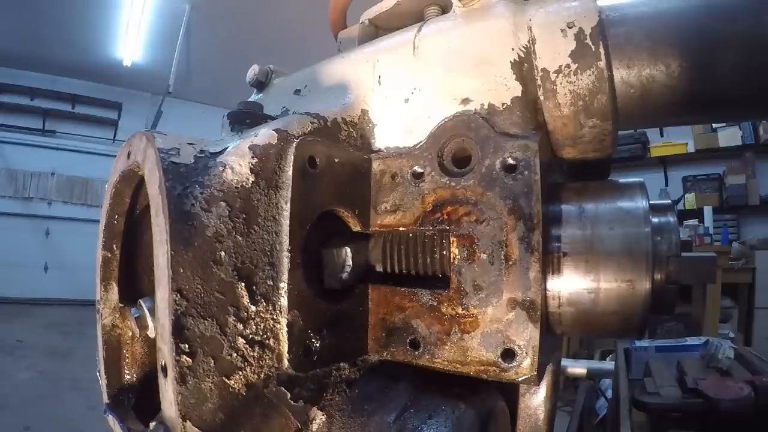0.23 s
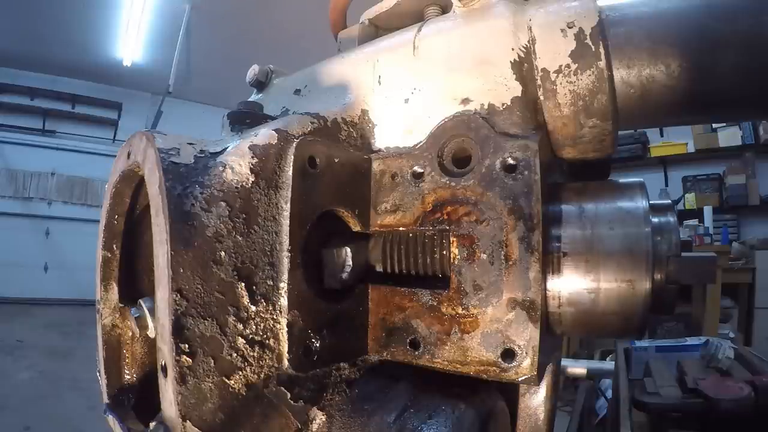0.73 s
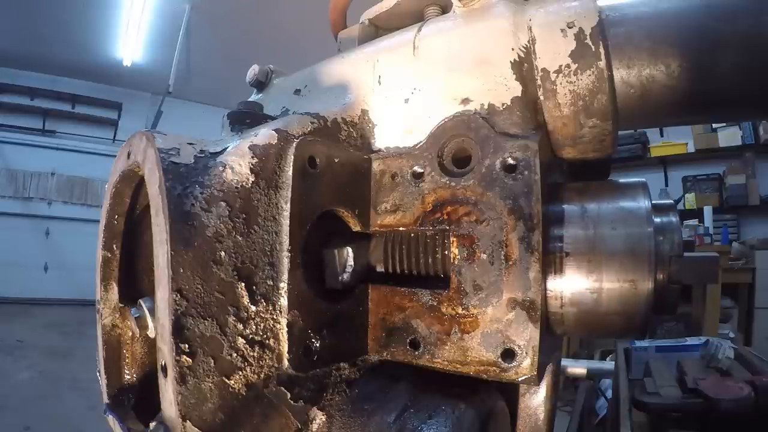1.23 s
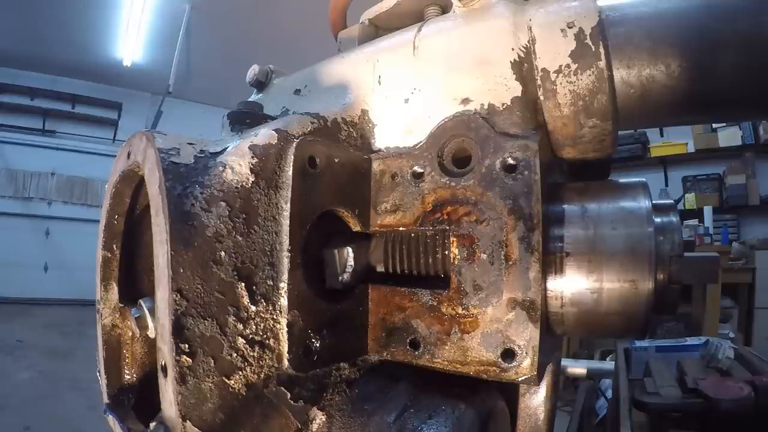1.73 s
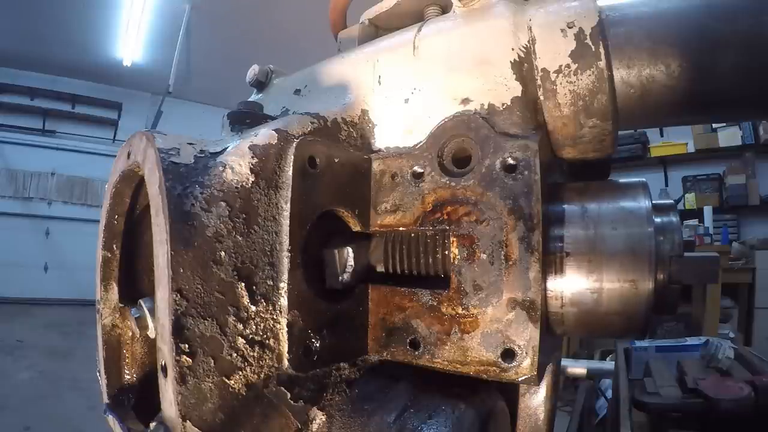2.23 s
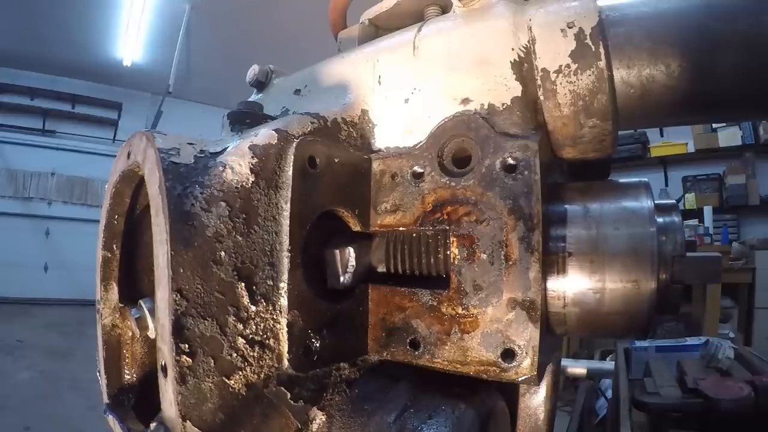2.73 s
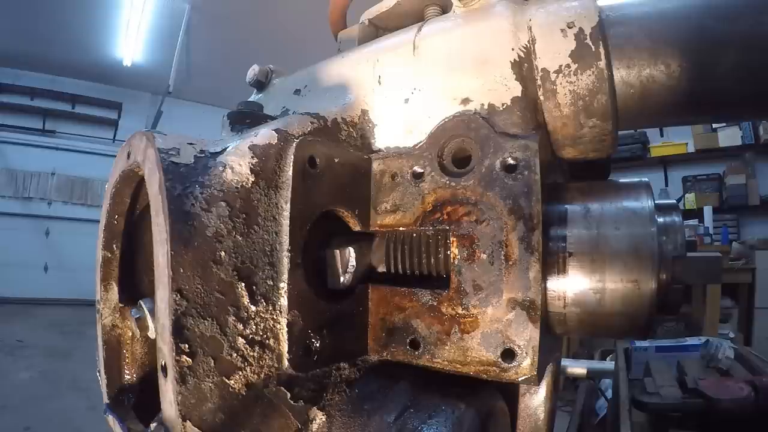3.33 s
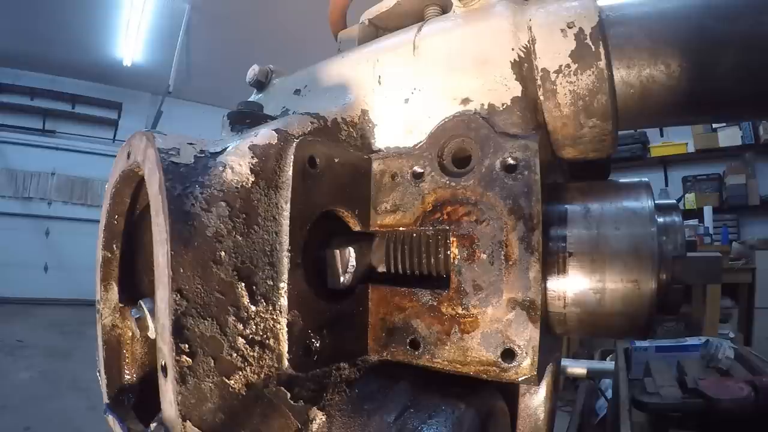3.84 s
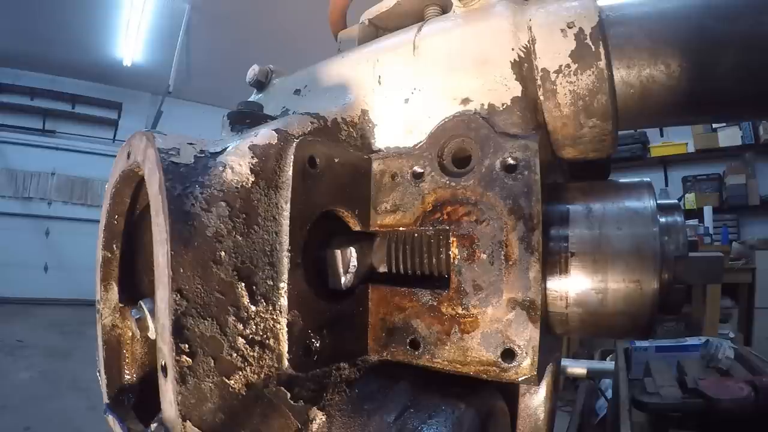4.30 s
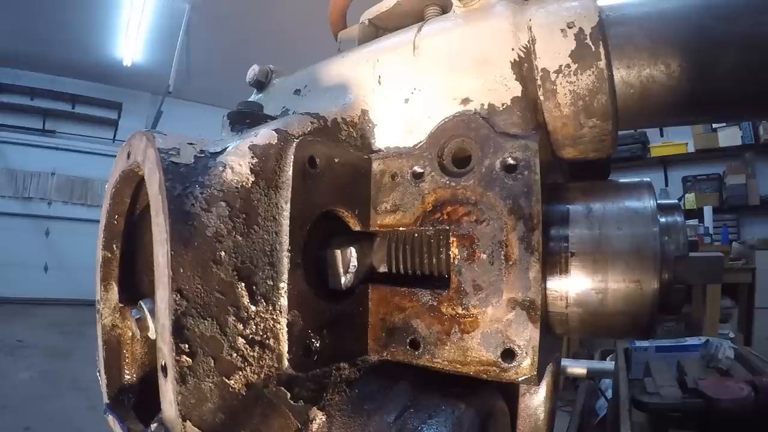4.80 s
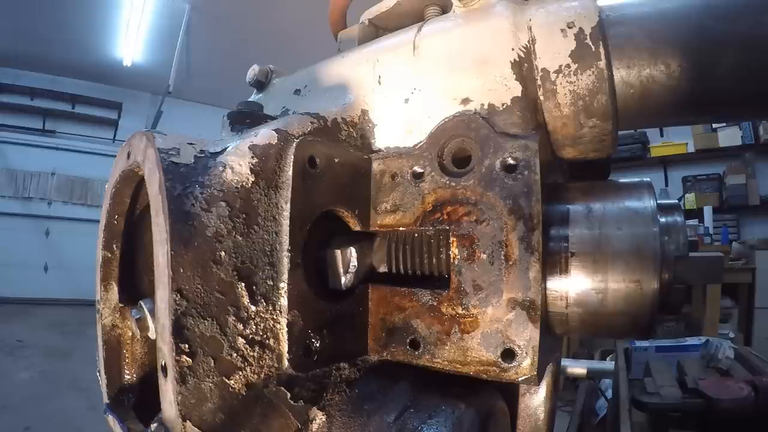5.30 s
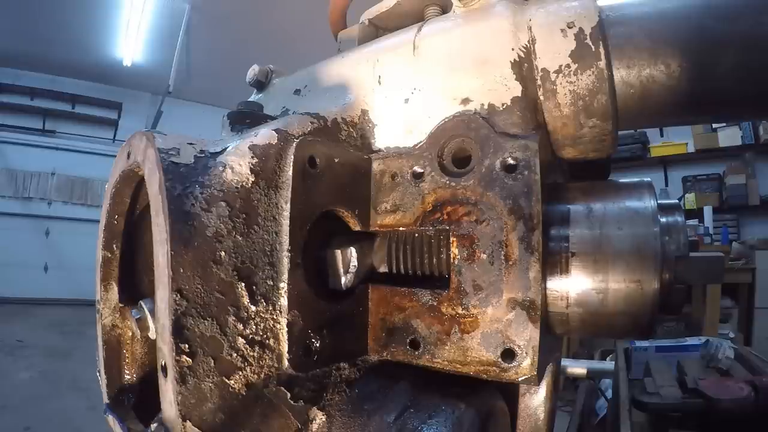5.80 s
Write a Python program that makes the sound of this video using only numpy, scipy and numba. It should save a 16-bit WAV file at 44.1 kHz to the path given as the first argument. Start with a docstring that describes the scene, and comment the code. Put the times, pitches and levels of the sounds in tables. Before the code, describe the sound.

Four loud, ringing metal bangs as a hydraulic ram forces a stuck shaft, with hand pump knocks and clinks between them over workshop hum.

```python
"""In a workshop, close to a small camera, a hydraulic ram forces a stuck shaft out of a cast housing.
Each stroke of the hand pump knocks, clinks and ticks as its metal parts meet. Then the shaft slips
with a bang that sets the steel and the room ringing. Shop machinery hums underneath,
and the camera's limiter turns everything down for a moment after each bang."""
import sys
import numpy as np
from scipy import signal
from scipy.fft import rfft, irfft
from scipy.io import wavfile
from numba import njit

SR = 44100
rng = np.random.default_rng(int(sys.argv[2]) if len(sys.argv) > 2 else 0)


def dump(signal):
    """Clip the signal to [-1, 1] and save it as 16-bit WAV at the path in sys.argv[1]."""
    limited = np.clip(np.atleast_2d(signal).T, -1, 1)
    pcm = np.round(limited * 32767).astype(np.int16)
    wavfile.write(sys.argv[1], SR, pcm)


N = 266977


def amp(db):
    """Turn decibels into a gain."""
    return 10 ** (np.asarray(db) / 20)


def along(points, f):
    """Read a (frequency, value) table between its rows, on a scale of octaves."""
    hz, value = np.transpose(points)
    return np.interp(np.log(f + 1), np.log(hz), value)


def unit(x):
    """Scale a sound so that its energy is 1."""
    return x / np.sqrt(np.sum(x ** 2))


def add(track, s, sound):
    """Mix a sound into a track, starting at s seconds."""
    start = int(s * SR)
    track[start:start + len(sound)] += sound[:max(N - start, 0)]


def click(colour, size=2048):
    """One click with the given colour, its balance of low and high frequencies."""
    f = np.arange(size // 2 + 1) * SR / size
    cepstrum = irfft(np.log(amp(along(colour, f))))
    cepstrum[1:size // 2] *= 2  # this line and the next pack the energy at the start
    cepstrum[size // 2 + 1:] = 0
    return unit(irfft(np.exp(rfft(cepstrum))))


def ring(notes):
    """One second of struck metal: each note drops 60 dB in its fade time."""
    t = np.arange(SR) / SR
    return sum(amp(db - 60 * t / fade_s) * np.sin(2 * np.pi * hz * t) for hz, db, fade_s in notes)


def scrape(length_s, size=4096, passes=4):
    """A dense burst of tiny impacts that holds steady over its length, then fades 20 dB over each further
    length."""
    fade = amp(-20 * np.arange(size) / SR / length_s)
    burst = rng.standard_normal(size) * fade
    for _ in range(passes):  # even out the frequencies
        spectrum = rfft(burst)
        burst = irfft(spectrum / np.abs(spectrum)) * np.minimum(10 * fade, 1)
    return unit(burst)


def soften(x, cutoff_hz):
    """A gentler contact pushes for longer and leaves the high notes quiet."""
    return signal.sosfilt(signal.butter(2, min(cutoff_hz, SR / 3), fs=SR, output="sos"), x)


def noise(gain_of_hz, width):
    """Stereo noise of strength 1: both ears share the mid part and get the side part with opposite signs."""
    f = np.arange(N // 2 + 1) * SR / N
    mid, side = rfft(rng.standard_normal((2, N))) * gain_of_hz(f)
    side = side * amp(along(width, f))
    stereo = irfft(np.array([mid + side, mid - side]), N)
    return stereo / stereo.std()


# colours of the low rumble and of the air noise: (frequency [Hz], relative level [dB])
RUMBLE_COLOUR = [(3, -27), (20, 10), (60, 8), (110, 0.5), (170, -14), (260, -15), (600, -60)]
AIR_COLOUR = [(100, -31), (170, -1), (395, -2), (468, 0), (586, -13), (668, -10.5), (720, -14.5),
              (806, -14), (1130, -8.5), (1770, -19), (2530, -24.5), (3540, -27.5), (3890, -25.5),
              (4350, -28), (15000, -34)]
# how wide the background noise sounds: (frequency [Hz], side minus mid [dB])
NOISE_WIDTH = [(60, -20), (110, -20), (200, -17), (380, -18.5), (700, -12), (1290, -10.5), (2380, -5),
               (4400, -5.5), (8120, -3), (15000, -4)]
# hum of motors and mains power: (frequency [Hz], level [dB])
HUM_TONES = [(25.3, -53), (50.7, -38), (76.8, -51.5), (101.5, -56.5), (120, -39), (146, -53.5), (154, -55),
             (172, -64), (468, -54.5), (1157, -61)]
# a thin, steady whine: (frequency [Hz], spread [Hz], level [dB])
WHINE_BANDS = [(4785, 48, -66.5), (9560, 170, -66), (14150, 380, -66.5)]


def machinery(waver_db=1.44, rumble_db=-45, air_db=-44):
    """Motors hum at a wavering level, over rumble, air noise and a thin whine."""
    t = np.arange(N) / SR
    out = amp(rumble_db) * noise(lambda f: amp(along(RUMBLE_COLOUR, f)), NOISE_WIDTH)
    out += amp(air_db) * noise(lambda f: amp(along(AIR_COLOUR, f)), NOISE_WIDTH)
    for hz, db in HUM_TONES:
        waver = np.interp(t, np.linspace(0, t[-1], 30), rng.standard_normal(size=30))
        out += np.sqrt(2) * amp(db + waver_db * waver) * np.sin(2 * np.pi * (hz * t + rng.random()))
    for hz, spread_hz, db in WHINE_BANDS:
        out += amp(db) * noise(lambda f: 1 / (1 + ((f - hz) / spread_hz) ** 2), NOISE_WIDTH)
    return out


# how long the room rings: (frequency [Hz], fade time [s])
ROOM_FADE = [(100, .5), (400, 0.68), (1200, 0.8952), (3000, 0.86), (6000, 0.7741), (10000, 0.5),
             (15000, 0.59)]
# colour of that ring: (frequency [Hz], relative level [dB])
ROOM_COLOUR = [(100, -3.5), (250, -3.5), (550, -4), (900, 1), (1250, -6), (1750, -5.5), (2100, -6),
               (2500, -3), (6000, -3.5), (14000, -1.5)]
# how wide it sounds: (frequency [Hz], side minus mid [dB])
ROOM_WIDTH = [(60, -23), (110, -12), (200, -33), (380, -39), (700, -41), (1290, -22.5), (2380, -19.5),
              (4400, -10.5), (8120, -5), (15000, 3.5)]


def room_tail(build_s=0.0028, bands=18):
    """Many reflections blur into a tail that builds quickly and lasts longest at middle pitches."""
    t, f = np.arange(SR) / SR, np.arange(SR // 2 + 1)
    spectrum = rfft(noise(np.ones_like, ROOM_WIDTH)[:, :SR]) * amp(along(ROOM_COLOUR, f))
    centres = np.geomspace(60, 16000, bands)
    tail = 0
    for hz, weights in zip(centres, np.eye(bands)):
        band = irfft(spectrum * along(np.c_[centres, weights], f))
        tail = tail + band * amp(-60 * t / along(ROOM_FADE, hz))
    return unit(tail * (1 - np.exp(-(t / build_s) ** 2)))


# echoes off hard surfaces nearby: (delay [s], relative level [dB])
NEAR_ECHOES = [(.0029, -8.5), (.0044, -8.5), (0.0138, -11), (0.0205, -21.5)]


def in_room(x, tail, tail_db, echo_db):
    """A sound arrives directly, then off nearby surfaces and from all round the room."""
    near = x.copy()
    for delay_s, db in NEAR_ECHOES:
        add(near, delay_s, amp(db + echo_db) * x)
    return near + amp(tail_db) * signal.fftconvolve(x[None], tail, axes=1)[:, :N]


# notes of the steel pump handle: (frequency [Hz], level [dB], fade time [s])
HANDLE_NOTES = [(459, -51, 0.86), (1260, -48, 0.18), (1460, -41.5, 0.55), (1620, -52, .2),
                (2190, -41.5, 0.15), (2610, -51, 0.76), (2710, -46, 0.49), (3060, -31.5, 0.06),
                (3930, -45.5, 0.33), (5450, -54, 0.47)]


def knock(s, db, colour, cutoff_hz, length_s, ring_db, db_per_octave=10):
    """Metal meets metal, brighter when harder, and the handle rings on. Returns impact and ring."""
    impact, ringing = np.zeros(N), np.zeros(N)
    hit = amp(db) * soften(click(colour), cutoff_hz * 2 ** (db / db_per_octave))
    add(impact, s, signal.fftconvolve(scrape(length_s), hit))
    add(ringing, s, amp(ring_db) * signal.fftconvolve(hit, ring(HANDLE_NOTES)))
    return np.array([impact, ringing])


# thuds of the handle: (time [s], level [dB])
THUD_HITS = [(1.109, -10.5), (2.6088, -1), (4.2315, 7), (4.274, -11), (5.7303, -2.5), (5.9878, -0.5)]
# their colour: (frequency [Hz], relative level [dB])
THUD_COLOUR = [(30, -46), (80, -15), (150, -4), (360, -2), (800, -14), (1400, -11.5), (1800, -22),
               (2400, -33), (6000, -24), (12000, -63)]


def handle_thuds():
    """The pump handle meets its stop with a dull thud."""
    return sum(knock(s, db, THUD_COLOUR, cutoff_hz=1790, length_s=0.00526, ring_db=-13)
               for s, db in THUD_HITS)


# clunks of the linkage, the rods that work the pump: (time [s], level [dB], hollow note level [dB])
CLUNK_HITS = [(1.3105, -6.5, 5), (2.827, 3.5, 6), (4.371, -1.5, -5)]
# their colour: (frequency [Hz], relative level [dB])
CLUNK_COLOUR = [(150, -61), (250, -22.5), (506, 2.5), (570, -6), (693, -27), (868, -20.5), (1420, -7.5),
                (1890, -15), (2440, -15.5), (2920, -17), (3450, -25.5), (3890, -23), (4520, -32),
                (5170, -31), (9000, -59), (11700, -86), (19800, -120)]
# tones in the hollow note: (frequency [Hz], level [dB], fade time [s])
LINKAGE_NOTES = [(483, -26.5, 0.074), (523, -33, 0.092), (1274, -27, 0.029)]


def linkage_clunks():
    """The linkage takes up its slack with a clunk and a short, hollow note."""
    impact, ringing = sum(knock(s, db, CLUNK_COLOUR, cutoff_hz=6000, length_s=0.0155, ring_db=-8.5)
                          for s, db, _ in CLUNK_HITS)
    for s, _, note_db in CLUNK_HITS:
        add(ringing, s, amp(note_db) * ring(LINKAGE_NOTES))
    return np.array([impact, ringing])


# clinks of the pin: (time [s], level [dB], relative handle ring [dB])
CLINK_HITS = [(1.579, -16.5, 0), (1.6250, -1, 2), (3.174, -4, -18), (3.196, -7, -22), (4.6806, -7, -12),
              (4.7072, -2.5, -2), (6.041, -16, -12)]
# their colour: (frequency [Hz], relative level [dB])
CLINK_COLOUR = [(350, -56), (600, -17.5), (1020, -8.5), (1390, 0.5), (2080, -10), (2650, -6), (3340, -20),
                (3910, -17.5), (4470, -26.5), (5240, -23), (6680, -34), (8020, -29.5), (11000, -39),
                (14300, -67), (22000, -120)]


def pin_clinks():
    """The pin that the handle turns on clinks brightly."""
    return sum(knock(s, db, CLINK_COLOUR, cutoff_hz=11000, length_s=0.0136, ring_db=ring_db)
               for s, db, ring_db in CLINK_HITS)


# ticks of the joint: (time [s], level [dB])
TICK_HITS = [(0.048, -4.5), (1.941, -4.5), (3.5373, -7), (5.014, -15), (5.4204, -11)]
# their colour: (frequency [Hz], relative level [dB])
TICK_COLOUR = [(260, -33), (450, -0.5), (855, -10.5), (1370, 2.5), (2360, -18), (3090, -11), (3530, -29),
               (3880, -11), (4490, -22.5), (8200, -22.5), (11000, -41), (14300, -69), (22000, -120)]


def joint_ticks():
    """The stuck joint ticks as the load builds."""
    return sum(knock(s, db, TICK_COLOUR, cutoff_hz=12000, length_s=.011, ring_db=-30)
               for s, db in TICK_HITS)


# pings of a small loose part: (time [s], level [dB])
PING_HITS = [(4.237, -46), (4.28, -44)]


def loose_part(pitch_hz=5950, fade_s=0.17):
    """A small loose part is jolted into a thin ping."""
    out = np.zeros(N)
    for s, db in PING_HITS:
        add(out, s, ring([(pitch_hz, db, fade_s)]))
    return out


# slips of the shaft: (time [s], level [dB], treble cut-off [Hz], rebound delay [s])
SHAFT_SLIPS = [(0.1963, 17, 4050, .0307), (2.1003, 16, 3800, 0.033), (3.6994, 15.5, 4000, .0307),
               (5.1695, 13.5, 1170, 0.018)]


def blows(rebound_db=-9.5, rebound_hz=1840, rebound_crack_db=-3.5, rebound_thump_db=9):
    """Each slip rebounds once, more weakly. Gives time, level, cut-off, extra crack and extra thump."""
    for s, db, cutoff_hz, delay_s in SHAFT_SLIPS:
        yield s, db, cutoff_hz, 0, 0
        # the rust has already broken, so the rebound hardly cracks
        yield s + delay_s, db + rebound_db, rebound_hz, rebound_crack_db, rebound_thump_db


# short notes of the loaded housing: (frequency [Hz], level [dB], fade time [s])
HOUSING_NOTES = [(119, -60, 0.15), (260, -23.5, 0.011), (593, -22.5, 0.021), (850, -23, 0.012),
                 (1224, 2, 0.011), (1764, -2.5, 0.0097)]
# long notes of the ram and its steel frame: (frequency [Hz], level [dB], fade time [s])
FRAME_NOTES = [(191.6, -24.5, 0.24), (257, -35.5, 0.34), (341, -31, 0.4), (503, -33, 0.17),
               (675, -49, 0.24), (777, -43, 0.23), (815, -26.5, 0.32), (894, -30, 0.39), (1012, -40, 0.45),
               (1045, -42, 0.52), (1125, -36, 0.3), (1190, -38, .3), (1278, -27.5, 0.24),
               (1450, -31.5, 0.65), (1640, -28, 0.34), (1730, -33, .35), (1935, -34, 0.36),
               (2517, -34, 0.4), (2660, -50, .4), (2960, -56, .4), (2970, -35, .4), (3510, -44, 0.34),
               (3870, -42, 0.37), (4050, -30, 0.47), (4060, -37, 0.58), (4850, -38, 0.38),
               (5600, -35, 0.41), (5800, -35, .35), (6723, -28, .33), (6900, -45, .3)]
# rust cracking in the joint: (frequency [Hz], relative level [dB])
CRACK_COLOUR = [(100, -9), (300, -7), (700, -22), (1300, 6), (1750, 7.5), (2150, -7.5), (2800, -4),
                (4200, -8), (5500, -12.5), (7000, -16.5), (9000, -24), (15000, -45)]
# the press kicking back against its bench: (frequency [Hz], relative level [dB])
THUMP_COLOUR = [(30, -27), (110, 2.5), (220, 3), (400, -7), (650, -12.5), (1000, -18), (3000, -42)]


def shaft_bangs(crack_db=16, crack_s=0.0076, thump_db=8, thump_s=0.0189, thump_lag_s=.0025, hard_hz=4040):
    """The shaft slips: the housing is struck, rust cracks, the bench thumps. Returns impact and ring."""
    impact, ringing = np.zeros(N), np.zeros(N)
    housing, frame = ring(HOUSING_NOTES), ring(FRAME_NOTES)
    for s, db, cutoff_hz, extra_crack_db, extra_thump_db in blows():
        crack = soften(signal.fftconvolve(scrape(crack_s), click(CRACK_COLOUR)), 6.8 * cutoff_hz)
        thump = signal.fftconvolve(scrape(thump_s), click(THUMP_COLOUR))
        octaves_softer = np.log2(hard_hz / cutoff_hz)  # a softer blow has less crack and thump
        add(impact, s, amp(db) * soften(housing, cutoff_hz))
        add(impact, s, amp(db + crack_db + extra_crack_db - 7 * octaves_softer) * crack)
        add(impact, s + thump_lag_s, amp(db + thump_db + extra_thump_db - 5 * octaves_softer) * thump)
        add(ringing, s, amp(db) * soften(frame, cutoff_hz))
    return impact, ringing


def scene():
    """Machinery behind, the pump a step away, the bangs close by."""
    tail = room_tail()
    bangs, frame_ring = shaft_bangs()
    knocks, pump_ring = handle_thuds() + linkage_clunks() + pin_clinks() + joint_ticks()
    pump = in_room(knocks, tail, tail_db=6, echo_db=-7) + pump_ring + loose_part()
    shaft = in_room(bangs, tail, tail_db=1, echo_db=-1) + frame_ring
    return machinery() + pump + shaft


@njit
def follow_peaks(x, attack, release):
    """Track a level, rising quickly and sinking slowly."""
    out, level = np.empty(len(x)), 0.
    for i in range(len(x)):
        level += (x[i] - level) * (attack if x[i] > level else release)
        out[i] = level
    return out


# the right microphone opening lets in more bass: (frequency [Hz], left minus right [dB])
MIC_BALANCE = [(50, -3), (130, -2.5), (250, -1.8), (500, -1.2), (1200, -.5), (5000, 0), (13000, -1.2)]


def record(dry, threshold_db=-1, range_db=15, attack_s=0.0014, release_s=0.49, ahead_s=0.0013, knee=4):
    """The camera hears through two unequal openings, and its limiter turns loud moments down."""
    t, f = np.arange(N) / SR, np.arange(N // 2 + 1) * SR / N
    x = irfft(rfft(dry) * amp(np.array([[.5], [-.5]]) * along(MIC_BALANCE, f)), N)
    excess = np.minimum(np.abs(x).max(axis=0) / amp(threshold_db), amp(range_db))
    turn_down = np.maximum(follow_peaks(excess, 1 / (attack_s * SR), 1 / (release_s * SR)), 1)
    x = x / np.interp(t + ahead_s, t, turn_down)
    x = x / (1 + np.abs(x) ** knee) ** (1 / knee)  # peaks that slip past are flattened
    treble_cut = signal.ellip(8, .2, 70, 15200, fs=SR, output="sos")  # steep, above 15200 Hz
    return signal.sosfilt(treble_cut, .96 * x)


dry = scene()
out = record(dry)
dump(out)
```